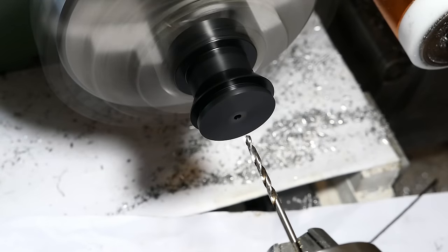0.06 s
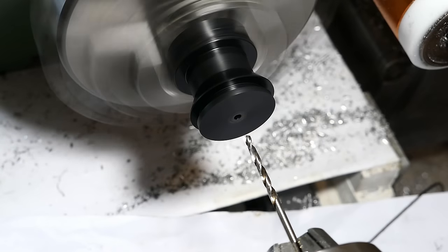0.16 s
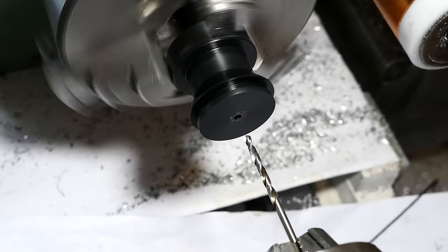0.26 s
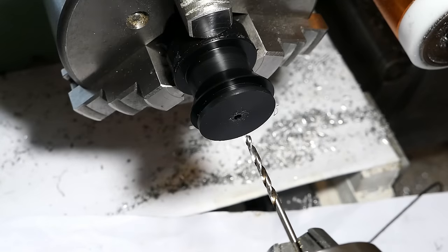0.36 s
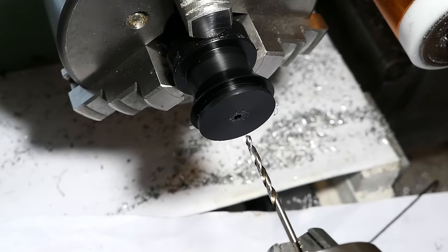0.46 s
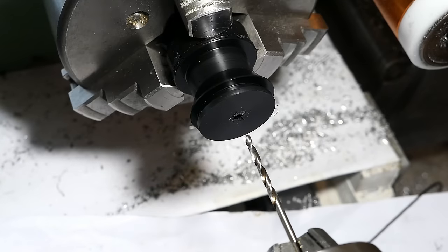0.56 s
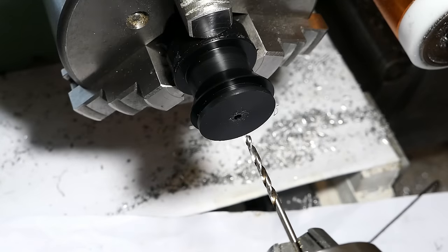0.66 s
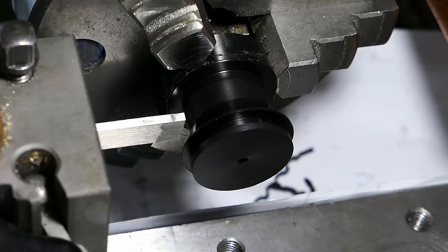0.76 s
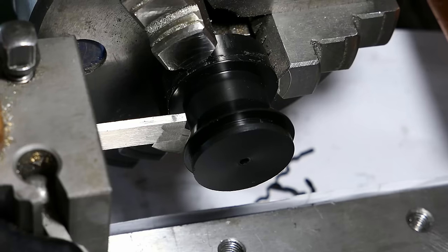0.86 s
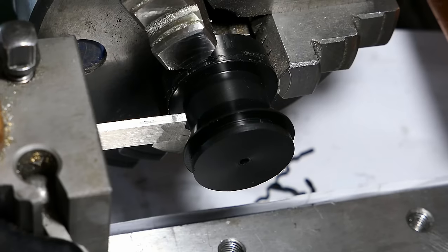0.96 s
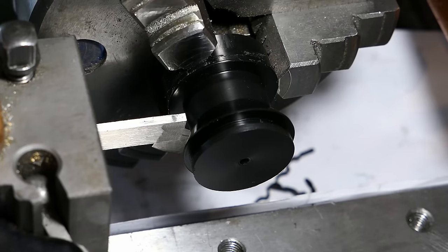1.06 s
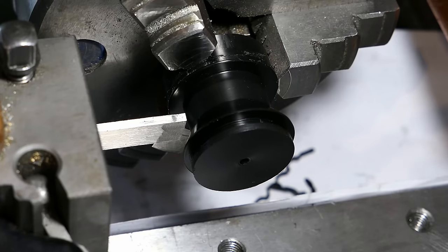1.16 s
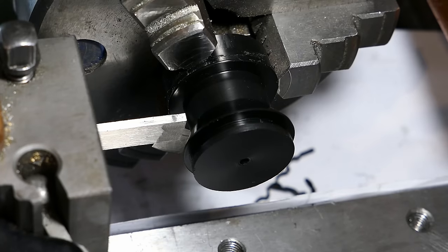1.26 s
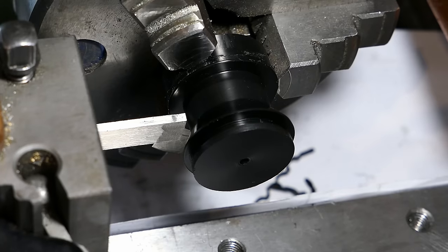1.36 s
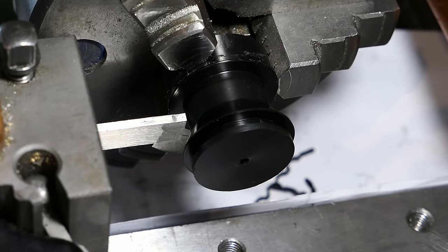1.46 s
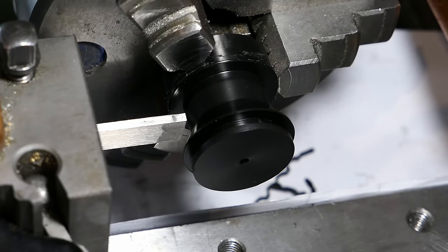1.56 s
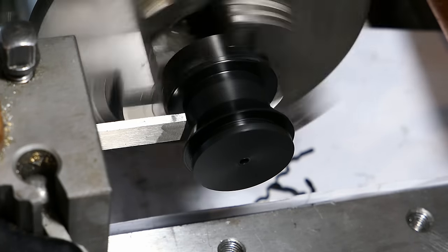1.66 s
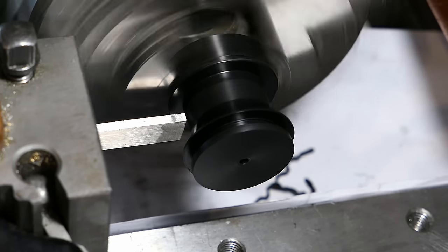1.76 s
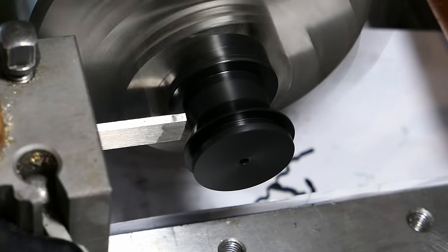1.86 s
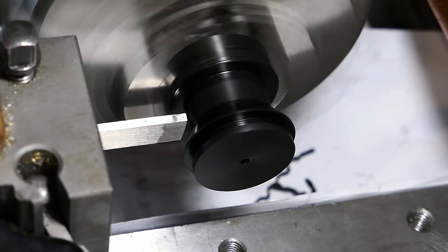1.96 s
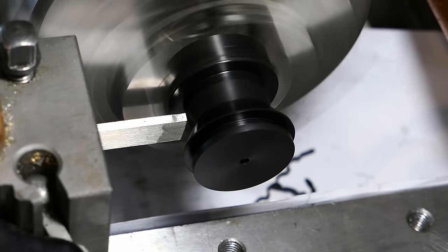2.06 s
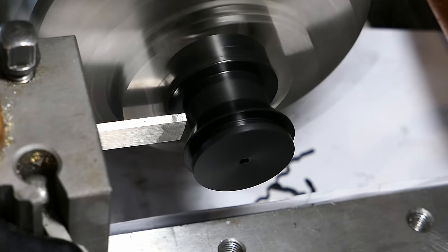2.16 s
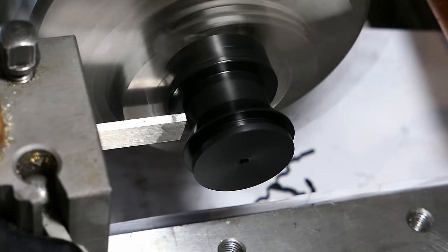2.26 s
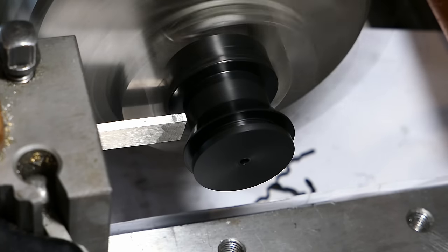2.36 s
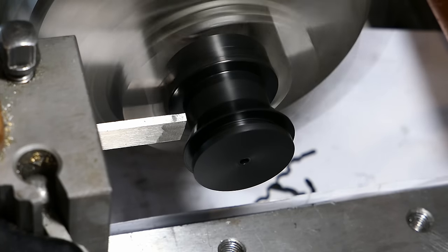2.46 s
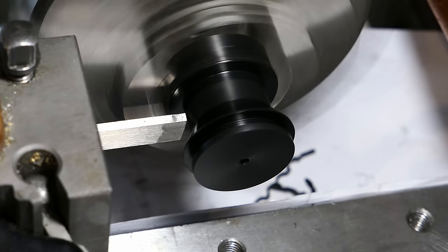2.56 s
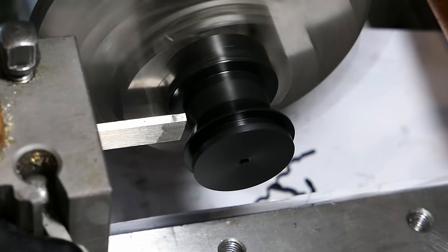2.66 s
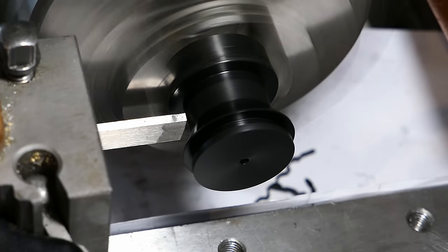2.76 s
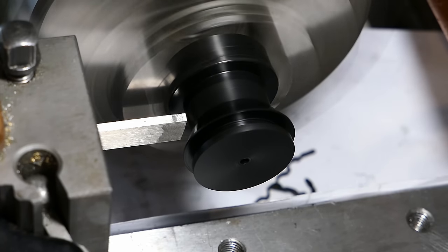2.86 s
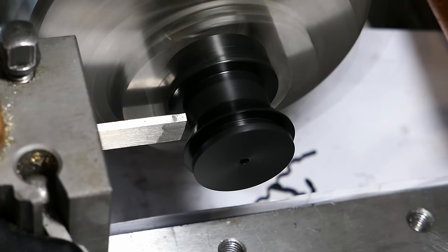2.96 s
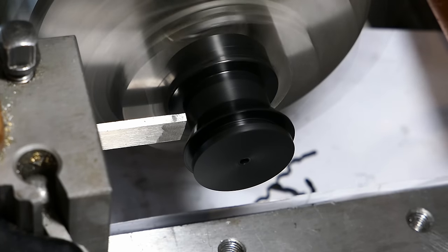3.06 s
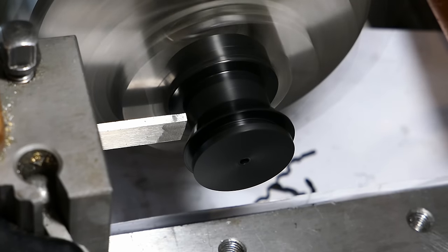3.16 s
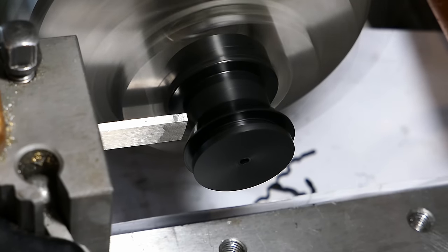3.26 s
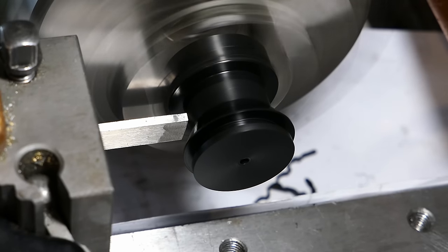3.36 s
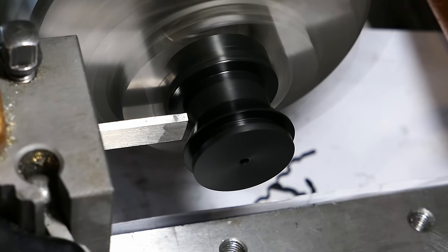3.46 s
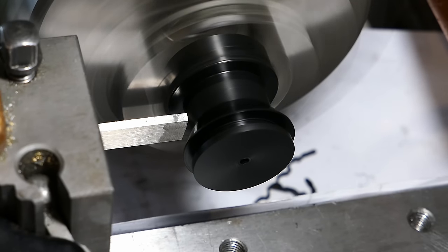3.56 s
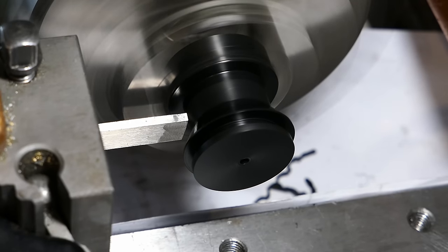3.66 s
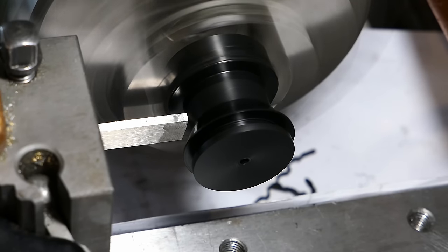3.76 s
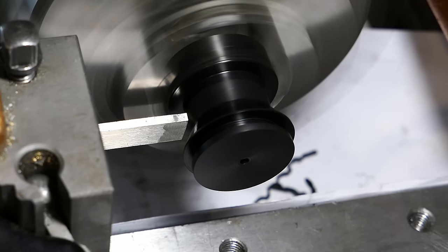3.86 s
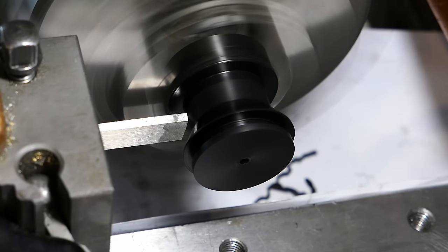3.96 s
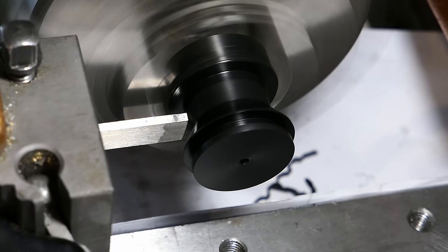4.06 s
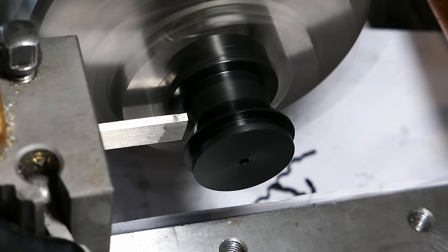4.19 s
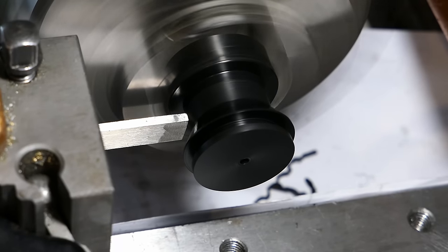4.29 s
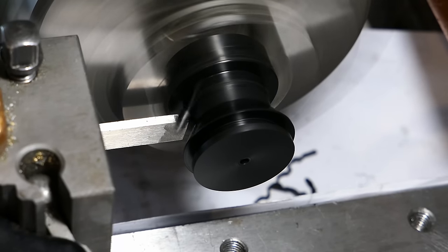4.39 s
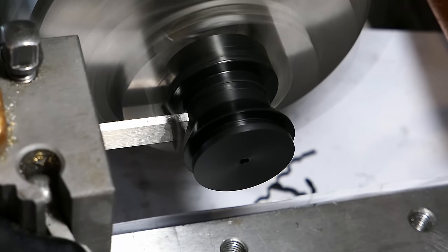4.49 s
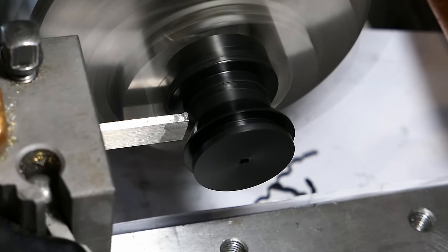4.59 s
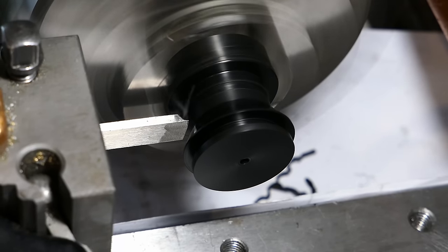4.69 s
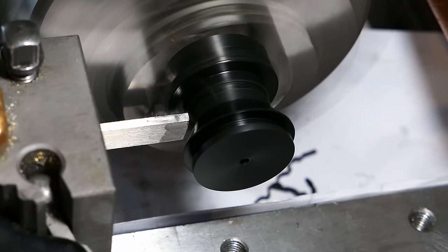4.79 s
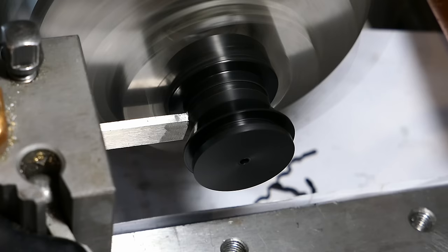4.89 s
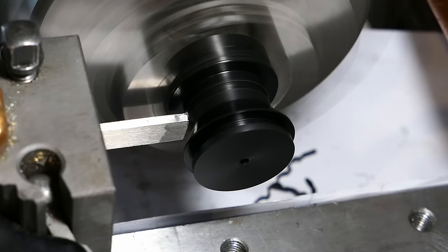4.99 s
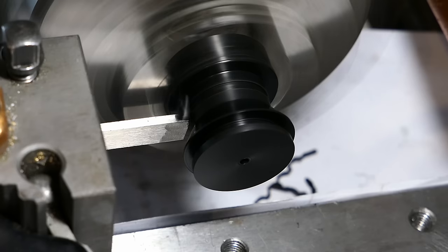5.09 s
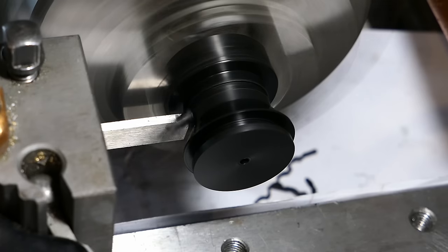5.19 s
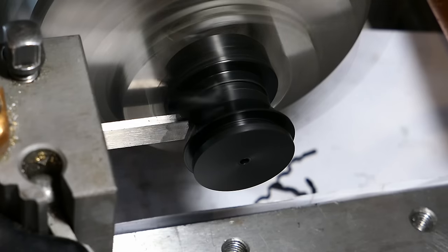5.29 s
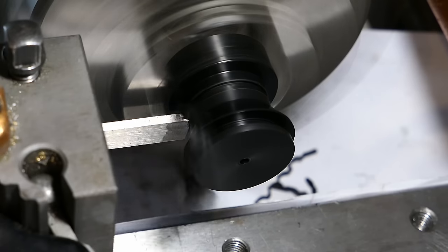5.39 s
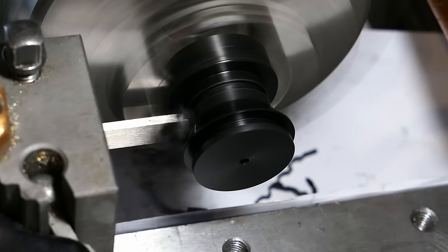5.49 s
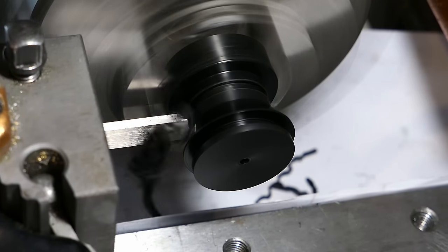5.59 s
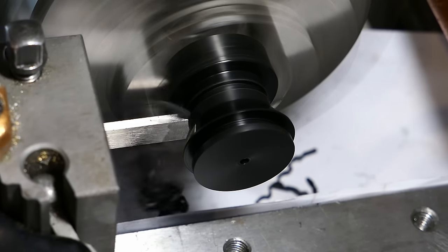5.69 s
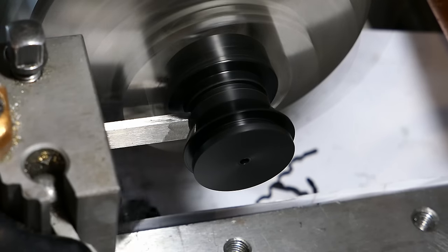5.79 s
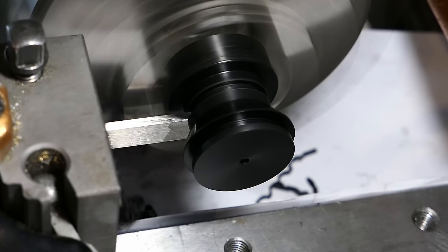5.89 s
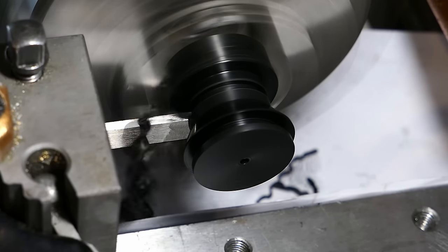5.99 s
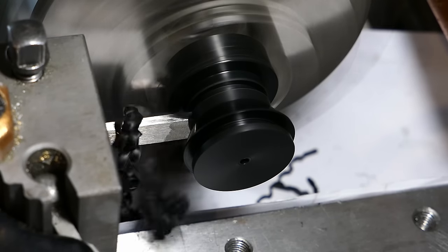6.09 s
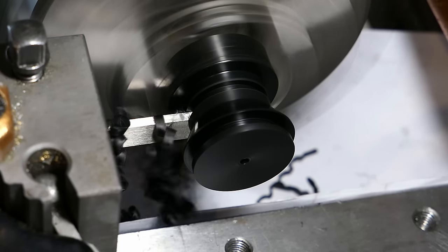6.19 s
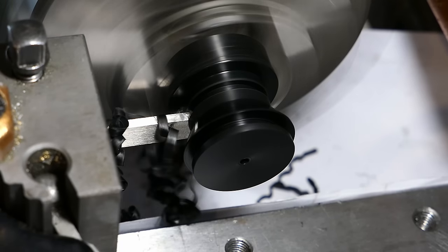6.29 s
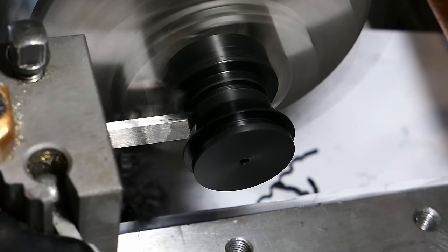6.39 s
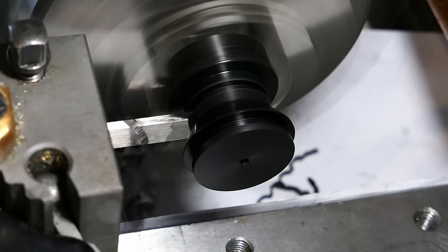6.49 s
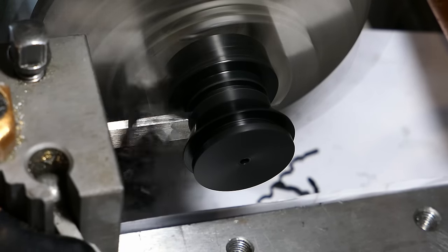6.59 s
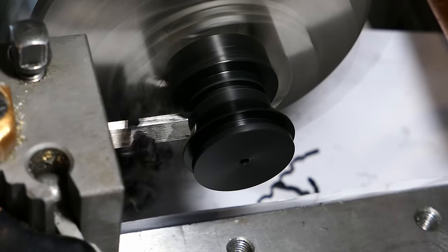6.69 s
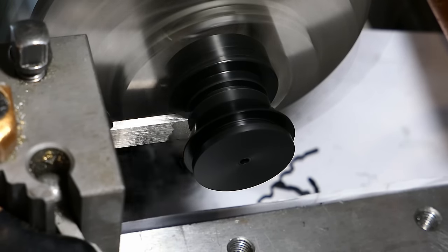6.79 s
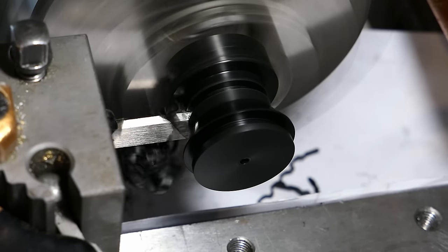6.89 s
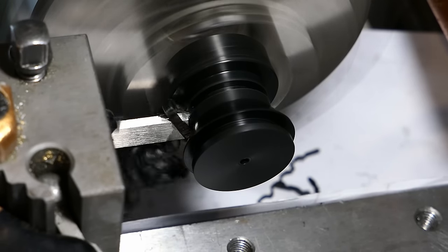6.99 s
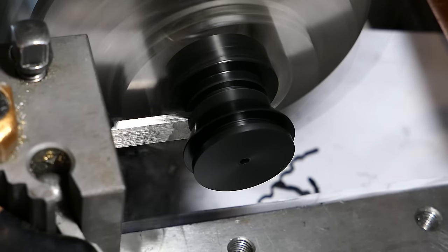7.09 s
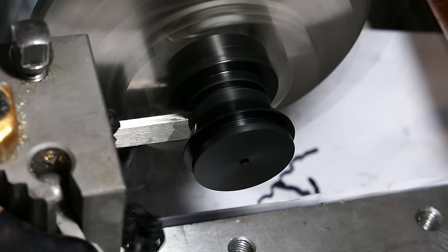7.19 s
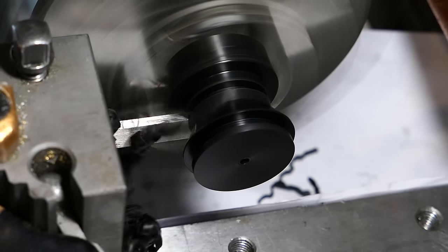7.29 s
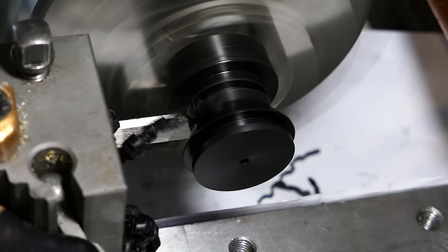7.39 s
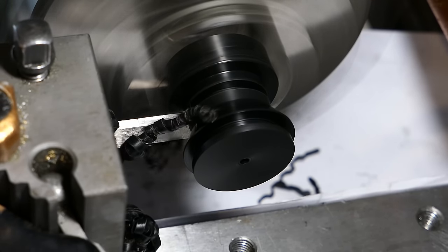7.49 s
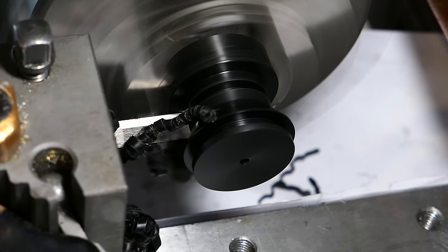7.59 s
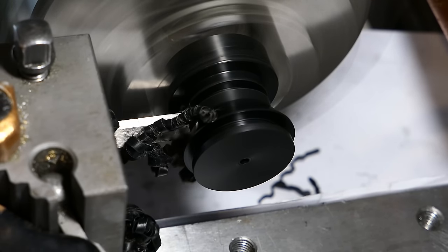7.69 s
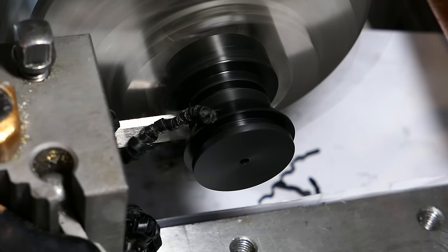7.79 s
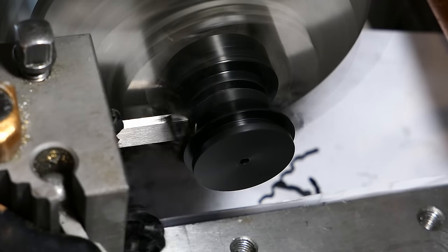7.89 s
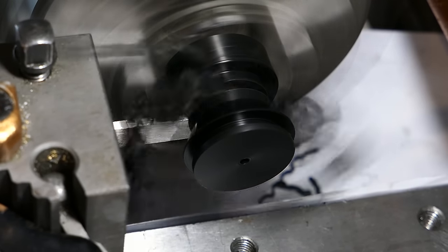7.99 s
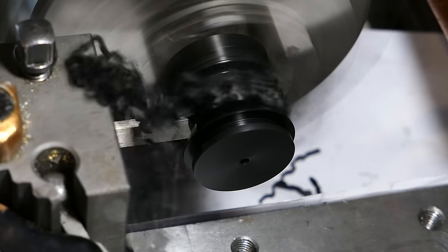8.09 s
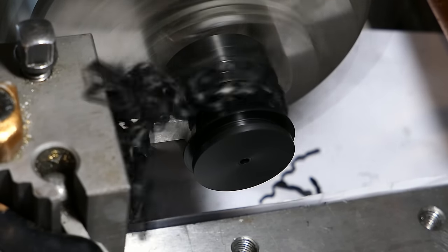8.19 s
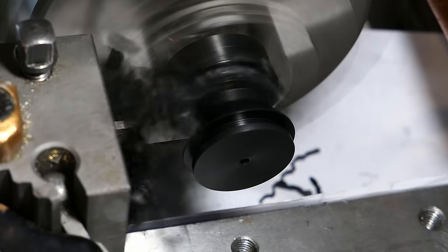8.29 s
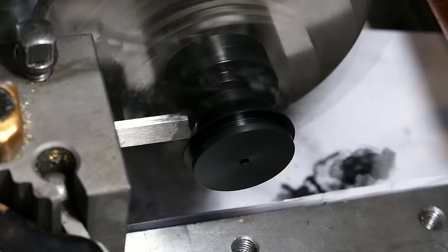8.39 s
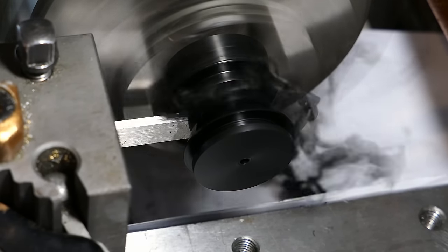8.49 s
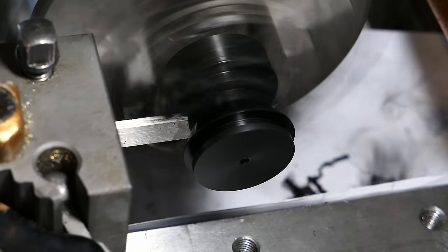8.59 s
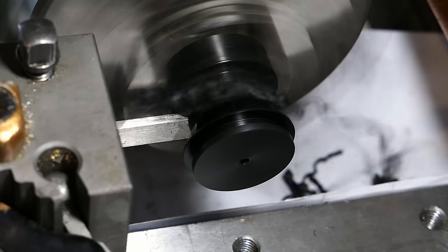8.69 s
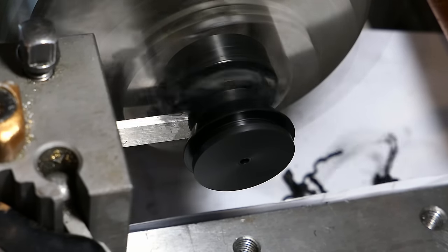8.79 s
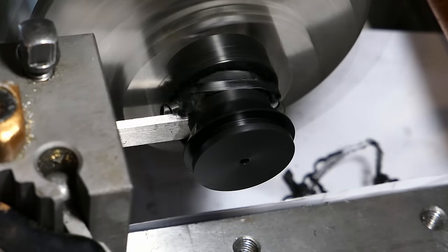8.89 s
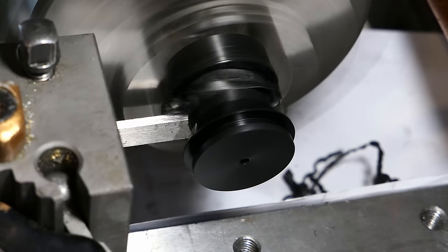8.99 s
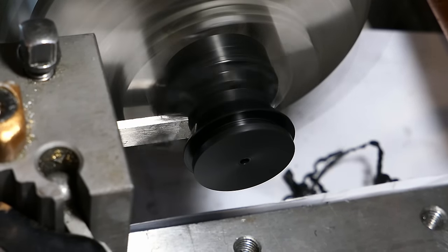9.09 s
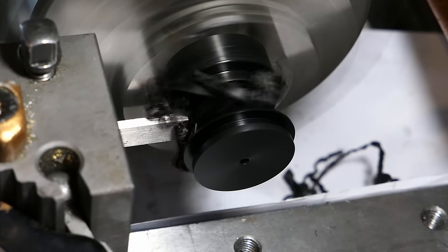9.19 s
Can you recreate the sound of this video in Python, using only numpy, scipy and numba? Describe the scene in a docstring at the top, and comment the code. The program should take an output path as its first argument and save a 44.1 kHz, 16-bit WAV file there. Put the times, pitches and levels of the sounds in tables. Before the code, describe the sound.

A small lathe sits close to one microphone in a workshop with low fan air throughout. From 0 to 0.4 s the braking gears clatter and fade, with quick switch ticks and a thin drive whine. Sound drops out completely from 0.8 to 0.9 s. Around 1.2 s comes a short sliding hiss with a tiny squeak; clicks cluster from 1.5 to 2.1 s as the spindle runs up to a steady bright rustle, with a sharper tick at 2.8 s. At 4.3 s a blade touches plastic: rough rasp, brief chirps and rapid slapping knocks until 5.6 s. The rasp pulses about twenty times a second. Longer squealing pushes start near 5.1, 6.3, 7.0, 7.7, 8.4 and 9.0 s, very high and hissy, gradually lower. Swarf slaps hard around 8.4, 8.6 and 8.9 s; the cut is still going at the end.

```python
"""In a workshop with a fan running, a small lathe is heard close by one mono microphone.
The spindle coasts to a stop, the sound drops out briefly, then the spindle runs up again among ticks.
A parting blade is fed in pushes into a plastic part: the holder rasps and chirps, the blade squeals lower
as it goes deeper, swarf slaps the machine. Rough noise through resonances makes the air, gears and cut;
knocks and ticks are struck modes; whine and squeak are sines."""
import sys
import numpy as np
from scipy import signal
from scipy.fft import rfft, irfft, next_fast_len
from scipy.io import wavfile
from scipy.ndimage import uniform_filter1d
from numba import njit

SR = 44100
rng = np.random.default_rng(int(sys.argv[2]) if len(sys.argv) > 2 else 0)


def dump(signal):
    """Clip the signal to [-1, 1] and save it as 16-bit WAV at the path in sys.argv[1]."""
    limited = np.clip(np.atleast_2d(signal).T, -1, 1)
    pcm = np.round(limited * 32767).astype(np.int16)
    wavfile.write(sys.argv[1], SR, pcm)


N = 407925
TIME = np.arange(N) / SR  # s
SILENCE_START_S, SILENCE_END_S = .795, .897
TURN_HZ, TURN_START_S = 20.33, 4.359  # turns of the part under the blade
BASS_EDGE_HZ = 240  # ticks and knocks carry little below this


def undb(db):
    """Gain of a level in dB."""
    return 10 ** (np.asarray(db) / 20)


def unit(x):
    """Scale to rms 1."""
    return x / np.sqrt(np.mean(x ** 2))


def columns(table):
    """Each column of a curve over time, sample by sample."""
    s, *rest = np.transpose(table)
    return [np.interp(TIME, s, column) for column in rest]


def gate(start, end, rise, fall):
    """0 to 1 from the start, back to 0 after the end; all in seconds."""
    return np.clip(np.minimum((TIME - start) / rise, 1 - (TIME - end) / fall), 0, 1)


@njit
def svf(x, hz, width):
    """State-variable band-pass with a moving centre, gain 1 there."""
    y, band, low = np.empty(len(x)), 0., 0.
    for i in range(len(x)):
        g, k = np.tan(np.pi * hz[i] / SR), width / hz[i]
        v = (band + g * (x[i] - low)) / (1 + g * (g + k))
        band, low, y[i] = 2 * v - band, low + 2 * g * v, k * v
    return y


def ring(x, hz, width_hz):
    """One resonance, at rms 1."""
    return unit(svf(x, np.minimum(hz * np.ones(len(x)), .45 * SR), float(width_hz)))


def steep_ring(x, hz, width_hz, skirt_hz):
    """A resonance whose skirts a second, wider one steepens, at rms 1."""
    return ring(ring(x, hz, width_hz), hz, skirt_hz)


def walk(rate):
    """Random levels held 1 / rate s and slewed twice; spread near 1."""
    hold = int(SR / rate)
    steps = np.repeat(rng.standard_normal(N // hold + 1), hold)
    return 1.3 * uniform_filter1d(uniform_filter1d(steps, hold), hold)[:N]


def colour(x, points):
    """Give x the spectrum of (Hz, dB) points, rms 1."""
    size = next_fast_len(N)
    hz, db = np.transpose(points)
    gain = undb(np.interp(np.log(np.fft.rfftfreq(size, 1 / SR) + 1), np.log(hz), db))
    return unit(irfft(rfft(x, size) * gain, size)[:N])


def grit(scatter_db, flicker_db, rate):
    """Dense contacts of uneven size whose strength flickers."""
    size_db = scatter_db * np.minimum(rng.exponential(size=N), 8)
    return rng.standard_normal(N) * undb(size_db + flicker_db * walk(rate))


def body(x, modes, flicker_db, rate):
    """Sum of resonances, each fluttering on its own."""
    return sum(undb(db + flicker_db * walk(rate)) * ring(x, hz, width) for hz, width, db in modes)


# Fan and shop air in the room. Each row: time in seconds, level in dB.
FAN_LEVEL = [(0, -40), (.12, -40.5), (.79, -42), (.9, -44.5), (2.1, -41), (6, -43), (7.9, -40.5),
             (9.25, -38)]
# Spectrum of the moving air. Each row: frequency in Hz, density in dB per Hz.
FAN_SPECTRUM = [(25, -40), (100, -12.5), (135, -11.5), (170, -6.5), (212, 4), (373, 3.5), (476, 3),
                (734, -3), (1100, -15), (1800, -16), (3000, -34), (6000, -76), (11000, -69), (16000, -57)]
# Soft duct resonances. Each row: frequency in Hz, width in Hz, level in dB.
DUCT_MODES = [(208, 30, -10), (475, 12.3, -11), (499.3, 20, -7.5), (365.3, 9.4, -19), (671, 49, -20)]
# Broad fluttering housing bands. Each row: frequency in Hz, width in Hz, level in dB.
HOUSING_BANDS = [(1152, 30, 0.5), (930, 220, -4.5), (1070, 190, -0.5)]
HOUSING_BEFORE_DB, HOUSING_AFTER_DB = -12, -20.5  # against the fan, before and after the silence ends
FAN_ROLL_OFF_HZ = 9000


def fan():
    """Turbulent air through a duct with a few soft resonances."""
    air = grit(0.95, 0.86, 25)
    housing_db = np.where(TIME < SILENCE_END_S, HOUSING_BEFORE_DB, HOUSING_AFTER_DB)
    housing = undb(housing_db) * body(grit(0.38, 1.0, 4.7), HOUSING_BANDS, 3.2, 16)
    roll_off = signal.butter(1, FAN_ROLL_OFF_HZ, fs=SR)
    rings = signal.lfilter(*roll_off, body(air, DUCT_MODES, 0.37, 18) + housing)
    rush = colour(grit(0.12, 0.85, 30), FAN_SPECTRUM)
    return undb(columns(FAN_LEVEL)[0]) * (rush + rings)


# Spindle belt and bearings, coasting, resting, running up and holding.
# Each row: time in seconds, level in dB.
SPINDLE_LEVEL = [(0, -44.5), (.08, -45.5), (.2, -55), (.35, -74), (1.45, -63), (1.55, -61), (1.8, -57),
                 (2.1, -47), (2.5, -47), (9.25, -43)]
# Spectrum of their rustle. Each row: frequency in Hz, density in dB per Hz.
SPINDLE_SPECTRUM = [(590, -71), (1000, -10), (1160, 0.5), (1670, -5.5), (2330, 0), (2500, 0.5), (2780, 0.5),
                    (4570, -7.5), (8700, -15), (14900, -26.5), (16000, -33)]
# Headstock resonances the spindle stirs. Each row: frequency in Hz, width in Hz, level in dB.
SPINDLE_RINGS = [(1950, 38, -13), (2323, 15, -11.5), (2335, 55, -10.5), (2730, 26, -13.5), (3870, 400, -14),
                 (4950, 220, -17.5), (7020, 500, -19.5), (7540, 140, -19), (7970, 60, -24),
                 (9560, 600, -19), (10550, 300, -25.5), (11450, 250, -30), (12500, 400, -29)]
# Motor drive whine while it brakes and accelerates. Each row: start and end in seconds, level in dB.
DRIVE_WHINES = [(.05, 0.23, -55), (1.483, 1.9, -70)]
WHINE_HZ = 8030  # wanders a few Hz
LOAD_START_S, LOAD_FULL_S, LOAD_DAMP_DB = 3.6, 5.4, -3.5  # the cutting load damps the resonances


def spindle():
    """Belt and bearing rustle in the headstock, with the drive's thin whine."""
    rustle = colour(grit(2.7, .8, 60), SPINDLE_SPECTRUM)
    load_db = np.interp(TIME, (LOAD_START_S, LOAD_FULL_S), (0, LOAD_DAMP_DB))
    rings = undb(load_db) * body(grit(0.92, 0.73, 44), SPINDLE_RINGS, 0.5, 15)
    phase = 2 * np.pi * np.cumsum(WHINE_HZ + 12 * walk(40)) / SR
    whine = np.sqrt(2) * np.sin(phase) * undb(1.5 * walk(50))
    whine_gain = sum(undb(db) * gate(start, end, .03, 0.06) for start, end, db in DRIVE_WHINES)
    return undb(columns(SPINDLE_LEVEL)[0]) * (rustle + rings) + whine_gain * whine


# Headstock casing, rung by the braking gears and by the ticks below.
# Each row: frequency in Hz, width in Hz, level in dB.
HEADSTOCK_MODES = [(555, 62, 0), (1150, 60, 4), (1330, 90, -12), (1770, 70, -2), (2160, 85, -8),
                   (2420, 79, -3), (2770, 120, -2), (3300, 150, -1.5), (3560, 100, -4), (4030, 70, 0.5),
                   (4670, 120, -5), (5020, 230, 0), (6000, 100, -11), (6500, 80, -11)]
COAST_DB, COAST_HOLD_S, COAST_T60_S = -43.5, 0.091, 0.36  # steady for the hold, then dying away


def coasting():
    """Dense rough contacts of the braking gears ring the headstock modes."""
    rough = unit(body(grit(2, 1.5, 150), HEADSTOCK_MODES, 3, 40))
    clatter = signal.sosfilt(signal.butter(2, 6000, fs=SR, output="sos"), rough)
    fade_db = -60 * np.clip(TIME - COAST_HOLD_S, 0, None) / COAST_T60_S
    return undb(COAST_DB + fade_db) * clatter


# Switch and clutch ticks. Each row: start in seconds, level in dB (before the common lift),
# pitch in Hz, lowest headstock mode against the click in dB.
SWITCH_TICKS = [(0.0074, -43, 3300, 8), (.027, -46, 2600, 6), (0.0555, -41.5, 2650, 6.5),
                (.071, -50, 2400, 10), (.113, -47, 3500, -7), (0.152, -45, 4100, -10),
                (0.164, -38, 2100, -19), (0.301, -53.5, 5300, 11), (0.323, -57.5, 1800, 19),
                (1.2261, -54, 4600, 2), (1.4737, -51, 9710, -8), (1.5364, -50, 3600, -13),
                (1.6523, -39.5, 2400, -15), (1.7453, -55, 3440, 5), (1.768, -55, 3300, 0),
                (1.7957, -55, 3520, -3), (1.8251, -44, 2980, -5), (1.897, -52, 3000, 0),
                (1.914, -48, 2400, -3), (1.9313, -38.5, 2330, -3), (1.954, -42.5, 1200, 3.5),
                (1.983, -49, 3600, 1), (2.033, -48, 2720, 0), (2.058, -46, 2400, 2),
                (2.8271, -33.5, 2300, -15), (3.1641, -45, 2720, -3), (3.3703, -47, 2750, 3),
                (4.0112, -48.5, 2040, 6)]
TICK_LIFT_DB, TICK_CLICK_DB, TICK_BRIGHT_DB, TICK_T60_S = 10.5, -8, -20, .03
TICK_FOCUS_OCT = 0.36  # a tick rings the modes near its pitch most


def ticks():
    """Short bursts: a click that rings the headstock modes round its pitch, and the lowest mode under it."""
    out, u = np.zeros(N), np.arange(SR // 8) / SR
    for s, db, pitch_hz, dull_db in SWITCH_TICKS:
        noise = rng.standard_normal(len(u)) * np.minimum(u / .001, 1) * undb(-60 * u / TICK_T60_S)

        def band(hz, width):
            """The burst through one mode, wide and narrow alike in strength."""
            return svf(noise, np.full(len(u), 1. * hz), 1. * width) / np.sqrt(width)

        click = undb(TICK_CLICK_DB) * band(pitch_hz, 0.39 * pitch_hz) + undb(TICK_BRIGHT_DB) * band(8800, 7000)
        for hz, width, mode_db in HEADSTOCK_MODES[1:]:
            focus_db = -4.3 * (np.log2(hz / pitch_hz) / TICK_FOCUS_OCT) ** 2
            click = click + undb(mode_db + focus_db) * band(hz, width)
        dull = band(*HEADSTOCK_MODES[0][:2])
        tick = click / np.abs(click).max() + undb(dull_db) * dull / np.abs(dull).max()
        first = int(s * SR)
        out[first:first + len(u)] += undb(db + TICK_LIFT_DB) * tick
    return signal.sosfilt(signal.butter(2, BASS_EDGE_HZ, "high", fs=SR, output="sos"), out)


SWISH_S, SWISH_LENGTH_S, SWISH_DB, SWISH_FADE_DB = 1.225, .12, -52.5, -8.5  # fades over its length
SQUEAK_S, SQUEAK_WIDTH_S, SQUEAK_DB = 1.282, .035, -62
SQUEAK_HZ, SQUEAK_HZ_PER_S = 11450, 24000  # highest pitch, and slope up to it and down again


def swish():
    """A short sliding hiss with a wavering squeak on top."""
    fade_db = SWISH_FADE_DB * np.clip((TIME - SWISH_S) / SWISH_LENGTH_S, 0, 1)
    hiss_gain = gate(SWISH_S, SWISH_S + SWISH_LENGTH_S, .008, 0.027) * undb(SWISH_DB + fade_db)
    hiss = ring(grit(1.5, 1.5, 37.2), 4400, 9000)
    hz = np.maximum(SQUEAK_HZ - SQUEAK_HZ_PER_S * np.abs(TIME - SQUEAK_S), 0)
    squeak = np.sqrt(2) * np.sin(2 * np.pi * np.cumsum(hz + 40 * walk(79)) / SR)
    squeak_gain = undb(SQUEAK_DB) * np.exp(-((TIME - SQUEAK_S) / SQUEAK_WIDTH_S) ** 2)
    return hiss_gain * hiss + squeak_gain * squeak


# Knocks on the machine: swarf slapping it, and stronger taps once a turn of the part. # Each row: start in
# seconds, peak level in dB (before the bass cut), brightness in dB per octave, contact in seconds.
MACHINE_KNOCKS = [(4.455, -41, 3, .003), (4.586, -25, 0, 0.0024), (4.652, -26.5, -0.5, 0.0058),
                  (4.737, -37, 0, .003), (4.85, -32, -10, 0.0058), (4.896, -27, 0, 0.0034),
                  (4.992, -32, 3, .003), (5.047, -28.5, -9, 0.0036), (5.1, -34, 1, 0.0018),
                  (5.2, -41, -8, .003), (5.248, -29, -3, 0.0026), (5.298, -39, -3, .003),
                  (5.342, -33, -5, .003), (5.44, -30, -2, 0.004), (5.5, -30, -3, .003), (5.546, -34, 5, .003),
                  (5.588, -28, -6, .0033), (7.51, -30, 1, 0.0041), (7.999, -35, 1, .0025),
                  (8.245, -26, -7, 0.0042), (8.37, -10, -1, 0.0021), (8.395, -28, -11, 0.012),
                  (8.49, -22, 1.5, 0.011), (8.527, -26.5, -4, 0.005), (8.6425, -13.5, 1.5, 0.004),
                  (8.81, -36, 5, 0.0038), (8.885, -17.5, 3.5, 0.007), (9.178, -28, -1, .003),
                  (9.23, -23, -12, 0.0024)]
# Modes of the struck machine. Each row: frequency in Hz, level in dB, t60 in seconds.
MACHINE_MODES = [(340, -7, .035), (520, -4, .035), (720, 0, .028), (930, -2, .02), (1300, -6, .012),
                 (1780, -5, .016), (2250, -5, .016), (2650, -3, .02), (3300, -7, .009), (4100, -9, .007),
                 (4900, -9, .009), (5600, -10, .007), (6600, -13, .005), (7900, -15, .005)]
TAP_DB, TAP_SCATTER_DB = -33, 2.5  # weak taps, once a turn
FIRST_BLOW, CLEAN_CONTACT_S = 1.6, .0055  # sharp touch against the scrape; long contacts lose it
RUSTLE_DB, RUSTLE_T60_S = -11.5, 0.21  # loose swarf scrapes on after each slap
SPOT_DB = 3.5  # each blow lands elsewhere and favours other modes
CRACK = .22  # the crack of the contact against the ring


def knocks():
    """A rough contact of a few ms rings the machine; weak taps come once a turn, at random strength."""
    turns = np.arange(TURN_START_S, N / SR, 1 / TURN_HZ)
    scatter = rng.standard_normal(len(turns))
    taps = [(s, TAP_DB + TAP_SCATTER_DB * r, 0.5, .003) for s, r in zip(turns, scatter)]
    out, u = np.zeros(N + SR), np.arange(SR // 10) / SR
    touch_len = int(.012 * SR)
    for s, db, tilt_db, contact in list(MACHINE_KNOCKS) + taps:
        press = np.exp(-(u[:touch_len] / max(contact, .0005) - .6) ** 2)
        force = rng.standard_normal(touch_len) * press
        force[int(.0015 * SR)] += FIRST_BLOW * np.linalg.norm(force) * (contact < CLEAN_CONTACT_S)
        spot_db = SPOT_DB * rng.standard_normal(len(MACHINE_MODES))
        modes = np.zeros(len(u))
        for k, (hz, mode_db, t60) in enumerate(MACHINE_MODES):
            level_db = mode_db + spot_db[k] + tilt_db * np.log2(hz / 900) - 60 * u / t60
            modes += (-1) ** k * undb(level_db) * np.sin(2 * np.pi * hz * u)
        rustle = rng.standard_normal(len(u)) * rng.exponential(size=len(u))
        rustle = rustle * undb(RUSTLE_DB - 60 * u / RUSTLE_T60_S)
        drive = rustle + np.pad(force, (0, len(u) - touch_len))
        blow = signal.fftconvolve(drive, modes)[:len(u)]
        blow[:touch_len] += CRACK * np.abs(blow).max() * force / np.abs(force).max()
        first = int(s * SR)
        out[first:first + len(u)] += undb(db) * blow / np.abs(blow).max()
    # small parts radiate no bass
    return signal.sosfilt(signal.butter(3, BASS_EDGE_HZ, "high", fs=SR, output="sos"), out[:N])


# Short chatter bursts of the holder. Each row: start in seconds, level in dB, pitch in Hz,
# length in seconds (centre to 1/e), other holder mode against it in dB.
CHATTER = [(4.517, -37, 3860, .003, -9), (4.548, -28, 3820, 0.007, -19), (4.566, -31, 3800, 0.0068, -7),
           (4.603, -27, 3820, 0.00325, -5), (4.6125, -17.5, 3700, 0.0031, -20),
           (4.662, -22.5, 3820, 0.0037, -12), (4.696, -30, 3860, 0.0029, 1),
           (4.712, -30, 3870, 0.0029, -12), (4.731, -32, 3150, 0.0054, -8), (4.924, -29, 3200, 0.0051, -5),
           (4.981, -30, 3800, 0.00183, 0), (5.027, -20, 3170, 0.0035, -10),
           (5.0734, -28.5, 3270, 0.0037, -3), (6.3, -22.5, 3820, 0.0029, -7), (6.93, -29, 3800, 0.0056, 0),
           (6.982, -29, 3850, 0.0036, -5)]
CHATTER_PAIR_HZ = (3200, 3860)  # the two holder modes that chatter together
CHATTER_ROUGH = .55  # uneven slips added to a burst's tone


def chirps():
    """Chatter swells unevenly on one holder mode and dies within a few ms."""
    out, slips = np.zeros(N), rng.standard_normal(N)
    for s, db, hz, length, other_db in CHATTER:
        near = slice(int((s - .03) * SR), int((s + .04) * SR))
        u = TIME[near] - s - length / 2
        tone = np.sin(2 * np.pi * (hz * u + rng.random()))
        uneven = steep_ring(slips[near], hz, 300, 500) / np.sqrt(2)
        other_hz = CHATTER_PAIR_HZ[int(hz < np.mean(CHATTER_PAIR_HZ))]
        other = steep_ring(slips[near], other_hz, 320, 550) / np.sqrt(2)
        burst = tone + CHATTER_ROUGH * uneven + undb(other_db) * other
        out[near] += undb(db) * np.exp(-(u / length) ** 2) * burst
    return out


# Pushes of the feed. Each row: start and end in seconds, squeal at the start and at the end in dB,
# jolt at the start in dB.
FEED_PUSHES = [(4.32, 4.47, -42, -40.5, -2), (4.712, 4.782, -44, -40.5, 6.5), (5.07, 6.172, -38, -37, -0.5),
               (6.342, 6.855, -36.5, -36, 4), (7.02, 7.567, -35.5, -35, -5), (7.742, 8.216, -37.5, -34, 9),
               (8.377, 8.8, -35.5, -36.5, 1.5), (9.015, 9.4, -38.5, -39, 5.5)]
PUSH_RISE_S, PUSH_FALL_S, JOLT_S = .035, 0.046, .018
IDLE_DB = -50  # squeal between pushes


def pushes():
    """How far the feed is engaged (0-1) and the squeal level in dB that follows."""
    engaged, db = np.zeros(N), np.full(N, 1. * IDLE_DB)
    for start, end, first_db, last_db, peak_db in FEED_PUSHES:
        on = gate(start, end, PUSH_RISE_S, PUSH_FALL_S)
        jolt_db = peak_db * np.exp(-np.clip(TIME - start - PUSH_RISE_S, 0, None) / JOLT_S)
        engaged = engaged + on
        db = db + on * (np.interp(TIME, [start, end], [first_db, last_db]) + jolt_db - IDLE_DB)
    return engaged, db


# Rasp of the edge on the part throughout the cut, before the extra of each push.
# Each row: time in seconds, level in dB.
RASP_LEVEL = [(4.28, -49), (4.39, -42.5), (4.5, -44), (4.7, -41), (5.5, -38), (6.4, -35.5), (7.7, -38.5),
              (8.6, -38), (9.25, -37)]
# Holder modes. Each row: frequency in Hz, width in Hz, level at first touch in dB, change in dB per s
# as the blade sinks in, extra dB early in the cut, drift in Hz per s.
HOLDER_MODES = [(1727, 50, -20.5, 6, -5, -3), (3125, 130, 11, -2.5, -5, -5), (3305, 120, 11.5, 0.8, 6, 22),
                (3374, 35, 3, 0.5, 2, 3.5), (3450, 450, 9, 1.5, 4, 14), (3630, 80, -14, 0, 5, 0),
                (3870, 51, 10, -0.26, 7.5, -9.5), (3996, 107, 4.5, 1.5, 15, 18.5),
                (4540, 110, -30, 7, -3, -11), (6530, 220, -1, 2, 6, 28)]
# Wash under the rasp. Each row: frequency in Hz, density in dB per Hz.
RASP_WASH_SPECTRUM = [(600, -8.5), (1200, -61), (3000, 11.5), (5500, -5.5), (7500, -6), (12000, -28),
                      (16000, -19)]
# Two modes of the part move as the groove deepens.
# Each row: time in seconds, low ring in Hz, flange in Hz.
PART_MODES = [(4.3, 3050, 8100), (5.6, 3000, 8300), (6.8, 2850, 8600), (7.8, 2700, 8720), (8.6, 2500, 8820),
              (9.25, 2440, 8900)]
RASP_PUSH_DB = 2  # a push roughens the rasp too
PART_DB, PART_DB_PER_S = -20, 3  # the part's own ring grows as the groove deepens
SETTLE_S = 0.85  # the early extra fades over this time


def rasp(engaged):
    """Stick-slip at the edge shakes the holder and the part all the time."""
    edge = grit(2.45, 1.1, 70)
    since = TIME - TURN_START_S
    cut_s = np.clip(since, 0, None)
    early = np.exp(-(cut_s / SETTLE_S) ** 2)
    holder = np.zeros(N)
    for hz, width, db, db_per_s, early_db, drift in HOLDER_MODES:
        level_db = db + db_per_s * since + early_db * early + 0.56 * walk(40)
        slips = edge * np.sign(rng.standard_normal(N))  # random signs keep the modes independent
        holder += undb(level_db) * steep_ring(slips, hz + drift * cut_s, width, 3 * width)
    part_hz, flange_hz = columns(PART_MODES)
    flange = undb(-15.5 + 3.7 * early) * steep_ring(edge, flange_hz, 370, 820)
    part = ring(edge, part_hz, 150) + undb(-10.0) * ring(edge, 1910, 310)
    part = undb(PART_DB + PART_DB_PER_S * since) * part
    wash = undb(-6.0) * colour(grit(0.96, 1.0, 42), RASP_WASH_SPECTRUM)
    level_db = columns(RASP_LEVEL)[0] + RASP_PUSH_DB * engaged
    return undb(level_db) * (unit(holder) + flange + part + wash)


# The deeper the groove, the lower both blade resonances. Each row: time in seconds,
# upper resonance in Hz, lower resonance in Hz, lower against upper in dB.
BLADE_RESONANCES = [(4.3, 15200, 10600, -6.5), (5.35, 15250, 10700, -5), (6.2, 14150, 10500, -6.5),
                    (6.87, 13400, 10350, -9), (7.06, 13200, 10200, -9), (7.56, 12560, 9850, -9),
                    (7.76, 12560, 9700, -8), (8.2, 12160, 9450, -4), (8.7, 11900, 9250, -3),
                    (9, 11750, 9250, 4), (9.25, 11700, 9100, 4.5)]
# More blade modes in the first touches. Each row: frequency in Hz, width in Hz, level in dB.
EARLY_BLADE_MODES = [(14200, 300, -12), (13100, 500, -12)]
# Clamp modes that the squeal wakes. Each row: frequency in Hz, width in Hz, level in dB.
CLAMP_MODES = [(6700, 530, -12), (10400, 320, -16)]
BLADE_WIDTH_HZ = 800
WAVER_DB, SURGE_DB, WOBBLE = 1.2, 1.6, .004  # slow and quick unevenness; share the pitch wobbles by
EARLY_DB, EARLY_FADE_S = 5, 4.9  # the upper ring is stronger in the first touches, until this fade
IDLE_RING_DB = -11  # between pushes the blade only brushes, and its upper ring falls into the hiss
POST_HZ, POST_WIDTH_HZ, POST_DB = 14550, 450, -13  # a high fixed mode of the tool post


def squeal(engaged, level_db):
    """Slips at the edge ring two falling blade resonances, strongest at each push of the feed."""
    upper_hz, lower_hz, lower_db = columns(BLADE_RESONANCES)
    slip = grit(0.55, 1.6, 180) * undb(WAVER_DB * walk(9.2) + SURGE_DB * walk(55))
    upper_hz = upper_hz * (1 + WOBBLE * walk(60))
    lower_hz = lower_hz * (1 + WOBBLE * walk(60))
    upper_db = EARLY_DB * gate(-1, EARLY_FADE_S, 1, 0.29) + IDLE_RING_DB * (1 - engaged)
    upper = undb(upper_db) * steep_ring(slip, upper_hz, BLADE_WIDTH_HZ, 4 * BLADE_WIDTH_HZ)
    lower = undb(lower_db) * steep_ring(slip, lower_hz, BLADE_WIDTH_HZ, 3 * BLADE_WIDTH_HZ)
    # the chip tears with a broad hiss around the two resonances
    chip = grit(0.75, 3.2, 90)
    tear = undb(-8.0) * ring(ring(chip, 0.83 * upper_hz, 9700), 0.81 * upper_hz, 14000)
    tear = tear + undb(-13) * ring(chip, 1.08 * upper_hz, 1800)
    post = undb(POST_DB) * ring(chip, POST_HZ, POST_WIDTH_HZ)
    early = gate(-1, EARLY_FADE_S, 1, 0.27) * body(chip, EARLY_BLADE_MODES, 2.0, 30)
    clamp = undb(1.05 * lower_db + 7.5) * body(chip, CLAMP_MODES, 2.4, 30)
    return undb(level_db) * (upper + lower + tear + post + early + clamp)


# Reflections off the slide thin these bands. Each row: frequency in Hz, width in Hz.
SLIDE_DIPS = [(4480, 73), (6180, 840)]


def cutting():
    """Stick-slip at the edge: the holder's rasp and the blade's squeal, pulsing with the turning part."""
    touch = np.clip((TIME - 4.31) / 0.0073, 0, 1)
    # the part runs slightly out of true, so the edge bites harder once a turn
    bite = 1 + 0.27 * np.exp(-((TIME - TURN_START_S) * TURN_HZ % 1) / 0.041)
    engaged, squeal_db = pushes()
    out = touch * bite * (rasp(engaged) + squeal(engaged, squeal_db))
    for hz, width in SLIDE_DIPS:
        out = out - 0.78 * svf(out, np.full(N, 1. * hz), 1. * width)
    return out


def scene():
    """Everything reaches one microphone, heard alike in both channels."""
    background = fan() + spindle() + coasting() + ticks() + swish()
    mono = background + knocks() + chirps() + cutting()
    return np.array([mono, mono])


TOP_HZ = 15640  # nothing is heard above this


def record(dry):
    """The sound drops out for a tenth of a second; a steep low-pass removes the top."""
    heard = np.clip(np.maximum(SILENCE_START_S - TIME, TIME - SILENCE_END_S) / 0.003, 0, 1)
    return signal.sosfilt(signal.ellip(12, .3, 80, TOP_HZ, fs=SR, output="sos"), dry * heard)


dry = scene()
out = record(dry)
dump(out)
```